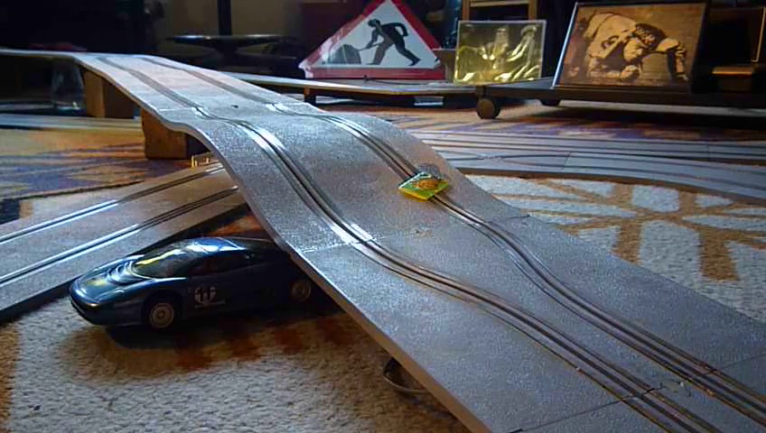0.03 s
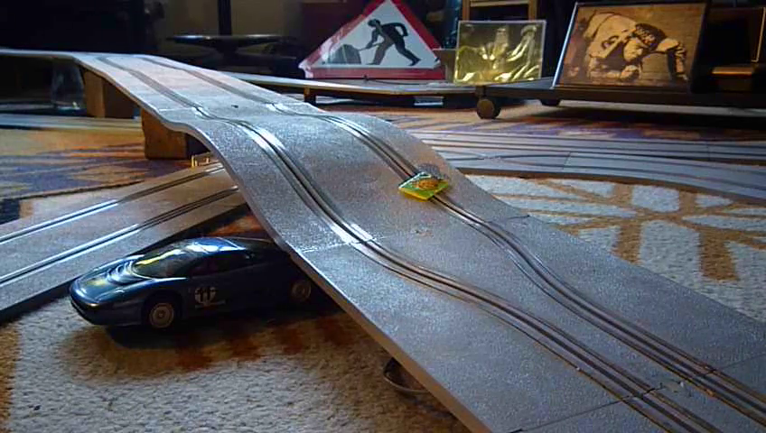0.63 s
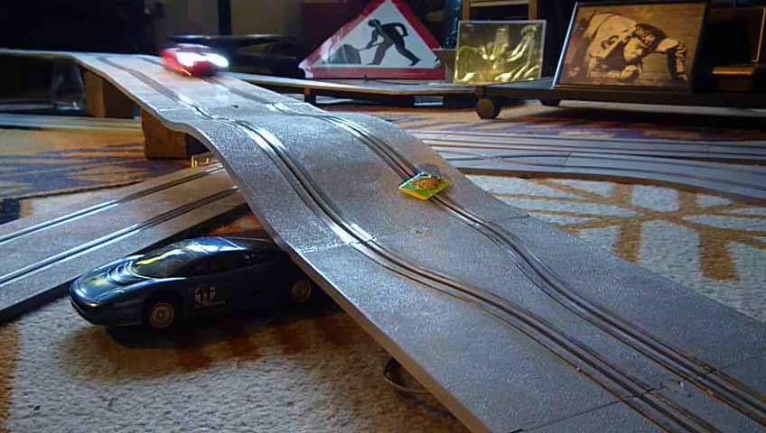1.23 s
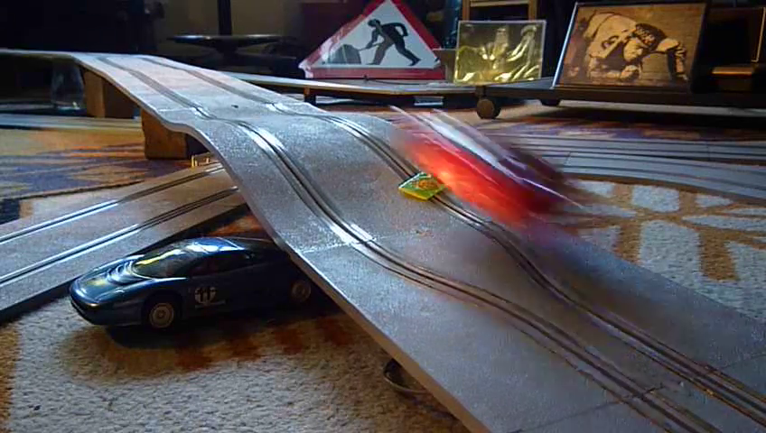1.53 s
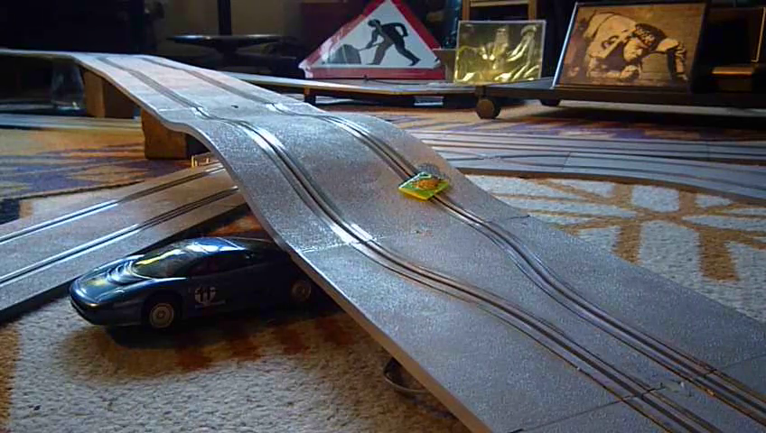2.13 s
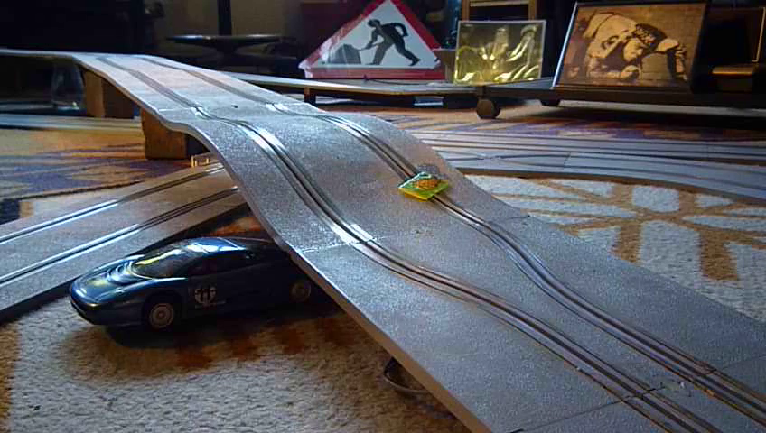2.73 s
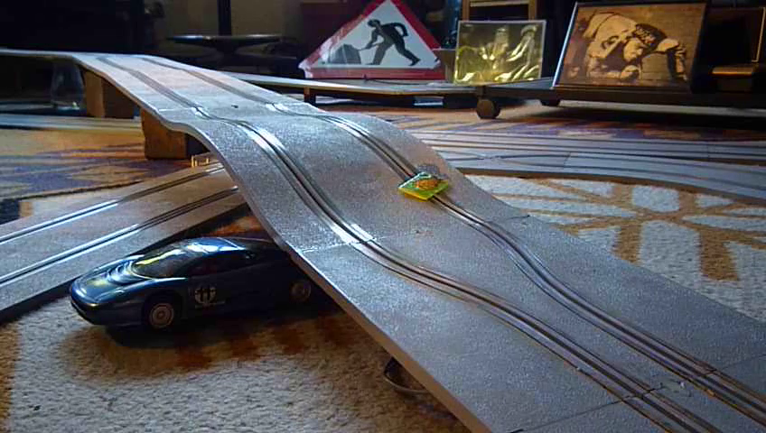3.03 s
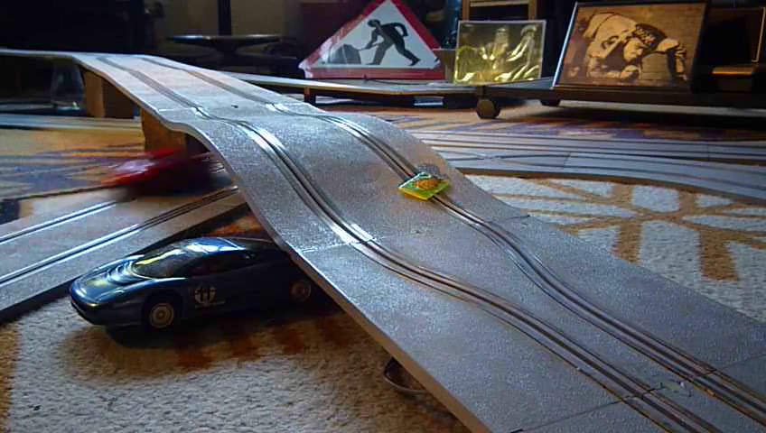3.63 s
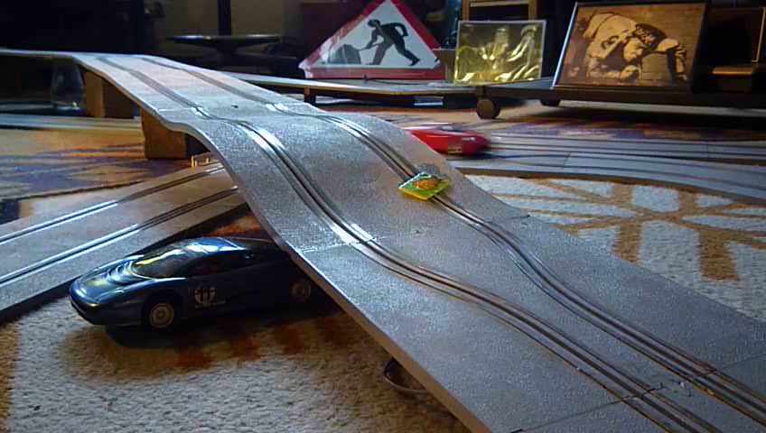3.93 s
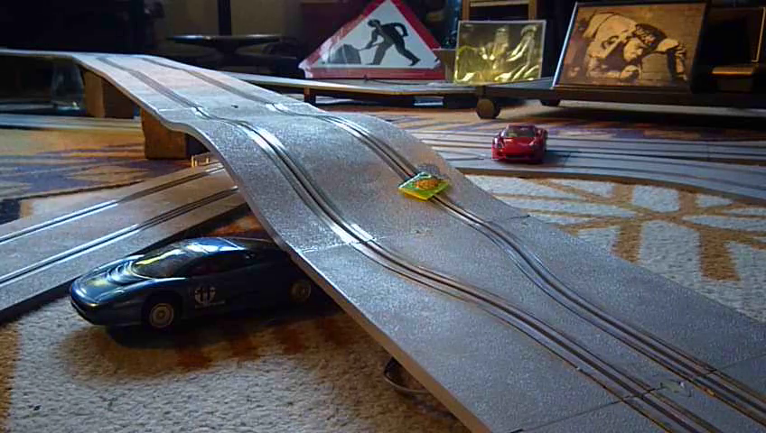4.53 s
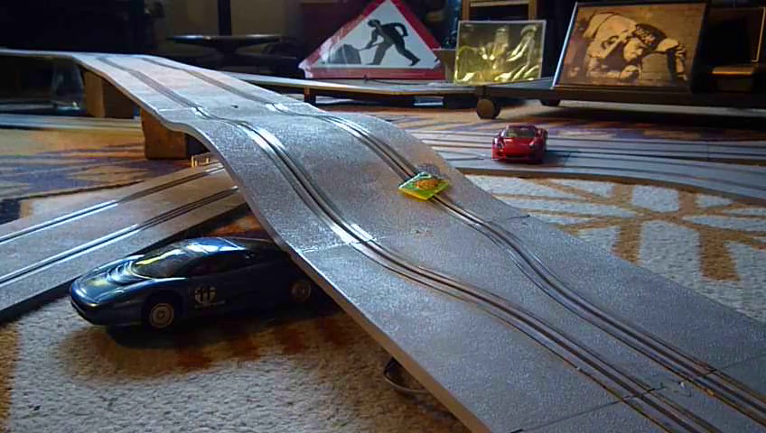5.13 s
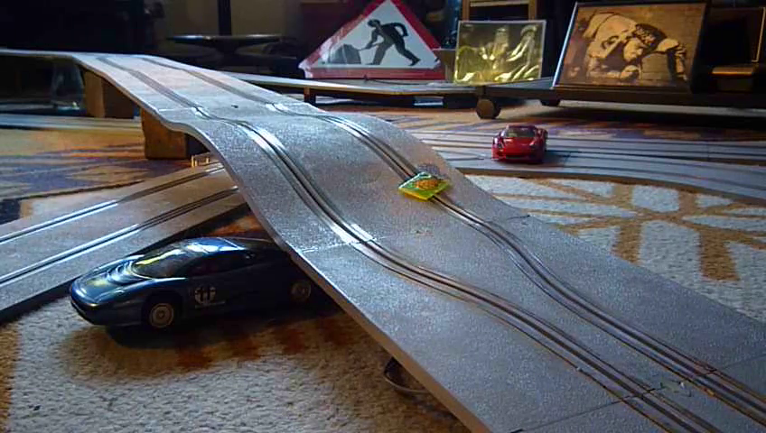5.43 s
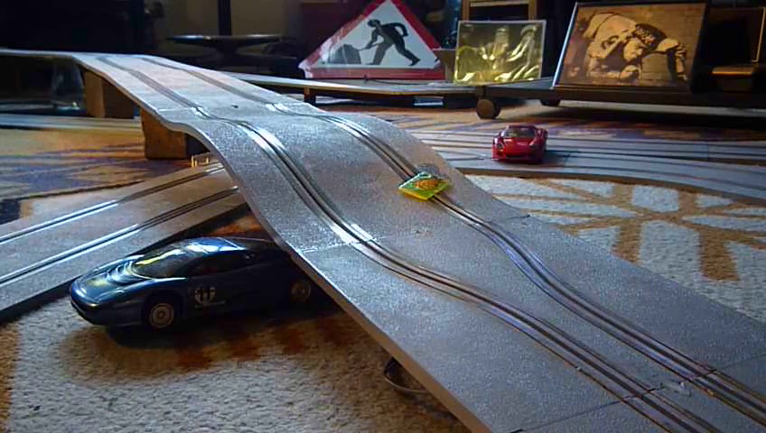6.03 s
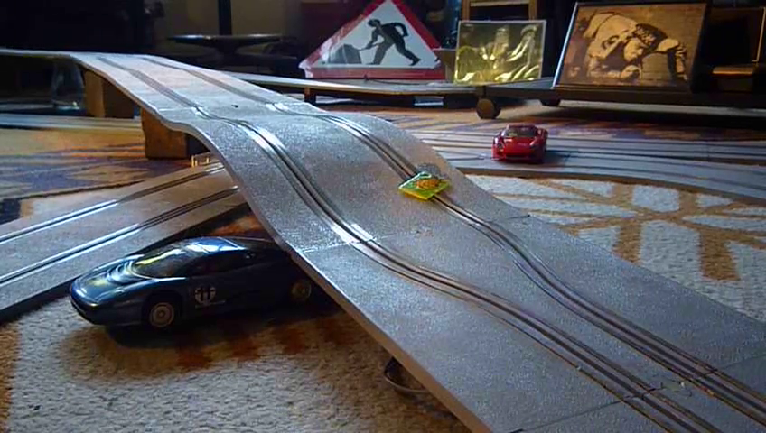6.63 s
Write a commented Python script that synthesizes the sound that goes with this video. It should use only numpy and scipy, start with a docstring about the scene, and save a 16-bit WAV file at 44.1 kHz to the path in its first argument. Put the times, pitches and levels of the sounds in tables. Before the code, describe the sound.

A toy slot car is already running on a plastic track in a furnished room, with a wavering motor whirr, rattling gears and a light tyre rumble. Its metal contacts squeak briefly at about 0.3 seconds and scrape around 1 second, as it speeds up over a hollow bridge and clicks across joints. From 1.5 to 1.8 seconds it hits a ramp close to the microphone, lands and bounces in a burst of sharp plastic clacks, the loudest moment. The motor drops in pitch and runs on, with a sharp click at 2.2 seconds and lighter ones until about 2.7. Around 4 seconds the car scrapes and skids with a few duller knocks, winding down to a stop by 4.3 seconds. A faint steady hiss with a thin whine, present throughout, remains to the end, broken by a light plastic tick at about 6.5 seconds.

```python
"""Slot car with a jump

A toy slot car laps a plastic track in a room: tyres rumble, gears whirr and the pickup braids
scrape the rails. It crosses a hollow bridge, jumps close to a small camera, lands, clicks over
joints, skids through a bend and stops. The camera adds hiss, a thin whine and faint crackle."""
import sys
import numpy as np
from scipy import signal
from scipy.fft import rfft, irfft, next_fast_len
from scipy.io import wavfile
from scipy.ndimage import map_coordinates

SR = 44100
rng = np.random.default_rng(int(sys.argv[2]) if len(sys.argv) > 2 else 0)


def master(y):
    """Save y as 16-bit WAV."""
    cut = np.clip(np.atleast_2d(y).T, -1, 1)
    pcm = np.round(cut * 32767)  # scale
    wavfile.write(sys.argv[1], SR, pcm.astype(np.int16))


N = 298998
CRUISE_TURNS_PER_S, STOP_S = 312, 4.3
BRIDGE_ON_S, BRIDGE_OFF_S = 0.62, 1.63


def amp(db):
    """Decibels to gain."""
    return 10 ** (np.asarray(db) / 20)


def unit_rms(x):
    """x scaled to rms 1."""
    return x / np.sqrt(np.mean(x ** 2) + 1e-20)


def at_hz(points, hz):
    """(Hz, value) points read on a log frequency axis."""
    freqs, values = np.transpose(points)
    return np.interp(np.log(hz + 1), np.log(freqs + 1), values)


def curve(points):
    """(seconds, value) points read at every sample."""
    return np.interp(np.arange(N) / SR, *np.transpose(points))


def wobble(knots_per_s):
    """A smooth random curve."""
    grid = np.arange(0, N * knots_per_s / SR + 1, 0.25)
    smooth = map_coordinates(rng.standard_normal(int(grid[-1]) + 4), [grid])
    return np.interp(np.arange(N) * knots_per_s / SR, grid, smooth)


def swells_db(rows):
    """A bell-shaped rise for each row."""
    t = np.arange(N) / SR
    return sum(db * np.exp(-((t - centre_s) / half_s) ** 2) for centre_s, half_s, db in rows)


def gate(start_s, end_s, fade_s):
    """1 from start to end, fading in and out inside that span."""
    t = np.arange(N) / SR
    return np.clip(np.minimum(t - start_s, end_s - t) / fade_s, 0, 1)


def through(x, response):
    """x played through an impulse response."""
    return signal.oaconvolve(x, response)[:len(x)]


def colour(spectrum, size=4096):
    """Minimum-phase impulse response of energy 1, shaped by (Hz, dB) points."""
    cepstrum = irfft(np.log(amp(at_hz(spectrum, np.fft.rfftfreq(size, 1 / SR)))))
    cepstrum[1:size // 2] *= 2
    cepstrum[size // 2 + 1:] = 0
    response = irfft(np.exp(rfft(cepstrum)))
    return response / np.linalg.norm(response)


def grains(per_s, spread_db):
    """Random tiny contacts of uneven size, rms 1."""
    present = rng.random(N) < per_s / SR
    signs = rng.choice([-1, 1], N)
    sizes = amp(spread_db * rng.standard_normal(N).clip(-2, 2))
    return unit_rms(present * signs * sizes)


def add(out, start_s, sound):
    """Mix a sound in at start_s."""
    part = out[round(start_s * SR):][:len(sound)]
    part += sound[:len(part)]


# The motor climbs on straights and sags in bends. Each row: time in seconds, turns per second.
MOTOR_TURNS_PER_S = [(0, 293), (.5, 262), (.68, 265), (.8, 340), (1.0, 365), (1.3, 430), (1.6, 440),
                     (1.9, 266), (2.05, 245), (2.2, 267), (2.5, 240), (2.85, 234), (3.35, 260), (3.6, 258),
                     (3.7, 300), (3.98, 330), (4.1, 180), (4.3, 64)]
# The car's path. Each row: time in seconds, distance from the microphone in metres.
DISTANCE_M = [(0, 2.1), (.55, 1.78), (.82, 1.58), (1.18, 1.44), (1.42, .74), (1.62, 0.65), (1.76, 0.76),
              (1.92, 1.02), (2.2, 0.66), (2.34, 2.27), (2.62, 1.03), (2.78, 1.41), (3.25, 0.86),
              (3.75, 1.2), (4.25, 1.36)]


def running_gain(speed_power, near_power):
    """Running noise grows with speed and nearness: 1 at cruise a metre away, 0 after the stop."""
    speed = curve(MOTOR_TURNS_PER_S) / CRUISE_TURNS_PER_S
    return speed ** speed_power / curve(DISTANCE_M) ** near_power * gate(-1, STOP_S, fade_s=0.05)


# Tyre rumble. Each row: frequency in Hz, relative level in dB.
TYRE_SPECTRUM = [(50, -30.5), (130, -12), (420, -13), (620, -3), (900, -2.5), (1250, -3), (2000, -10),
                 (3200, -11.5), (8000, -32)]
# Track resonances. Each row: frequency in Hz, bandwidth in Hz, relative level in dB.
TRACK_MODES = [(620, 30, -7.5), (730, 52, -10), (884, 79, -7), (954, 52, -0.5), (1060, 98, -4),
               (1206, 110, -3), (1500, 89, -5.5), (1927, 190, -7), (2480, 170, -3.5)]
# The tail slides; tyres and gears judder. Each row: centre and half length in seconds, rise in dB.
TAIL_SLIDES = [(.36, 0.05, 7), (1.1, .035, 4), (1.32, .045, 6), (1.607, 0.019, 8.5), (1.69, 0.035, 5.5),
               (4.045, 0.048, 8)]


def rolling(tyre_db=-55, ring_db=-66, lumpy_db=2.5, section_db=4):
    """Tyres and guide blade drum on the track, whose resonances vary from section to section."""
    gain = running_gain(speed_power=1, near_power=1) * amp(swells_db(TAIL_SLIDES) + lumpy_db * wobble(45))
    bumps = grains(per_s=2500, spread_db=4.5) * gain
    out = amp(tyre_db) * through(bumps, colour(TYRE_SPECTRUM))
    t = np.arange(SR // 8) / SR
    for hz, width_hz, db in TRACK_MODES:
        ring = np.exp(-np.pi * width_hz * t) * np.sin(2 * np.pi * hz * t)
        out += amp(ring_db + db + section_db * wobble(7)) * through(bumps, ring / np.linalg.norm(ring))
    return out


# Three-pole motor and pinion. Each row: multiple of the shaft speed, relative level in dB.
MOTOR_ORDERS = [(2, -0.5), (3, 5), (4, -7.5), (5, -5.5), (6, 2), (7, -3.5), (9, -2), (12, -10)]
# Chassis response to the drive. Each row: frequency in Hz, relative level in dB.
CHASSIS_SPECTRUM = [(300, -32.5), (900, -10.5), (1250, -7.5), (1450, -1), (1680, -.5), (1900, -12.5),
                    (2450, -8), (2900, -17.5), (3500, -10), (4500, -23)]


def gears(rattle_db=-54.5, tone_db=-62, waver=0.02527, depth=0.47, flutter_db=3):
    """Motor tones waver with load and loose teeth rattle once a turn, both through the chassis."""
    turns = np.cumsum(curve(MOTOR_TURNS_PER_S) * (1 + waver * wobble(70))) / SR
    chassis = colour(CHASSIS_SPECTRUM)
    teeth = (1 + depth * np.cos(2 * np.pi * turns)) * grains(per_s=3000, spread_db=1.5)
    rattle = unit_rms(through(teeth, chassis)) * amp(rattle_db + swells_db(TAIL_SLIDES))
    tones = sum(amp(db + flutter_db * wobble(40)) * np.sin(2 * np.pi * (order * turns + rng.random()))
                for order, db in MOTOR_ORDERS)
    whirr = amp(tone_db) * unit_rms(through(tones, chassis))
    return running_gain(speed_power=0.37, near_power=0.83) * (rattle + whirr)


# Contact with the rails. Each row: frequency in Hz, relative level in dB.
RAIL_SPECTRUM = [(500, -16.5), (1500, -2), (2400, 4.5), (3000, 1.5), (3600, 2.5), (4600, -4), (5400, -3),
                 (6500, -1.5), (8000, -5.5), (10000, -38.5)]
# The braids dig in. Each row: centre and half length in seconds, rise in dB.
BRAID_SCRAPES = [(.995, 0.046, 15.5), (1.38, .15, 2), (2.12, 0.046, 9), (2.39, .02, 9), (2.63, .08, 4),
                 (3.6, 0.1, 4), (3.895, 0.026, 10), (4.04, 0.072, 10)]
# Braid squeal. Each row: frequency in Hz, relative level in dB.
SQUEAL_SPECTRUM = [(350, -23), (470, 3), (620, -21), (880, -16), (1400, -33), (3800, -14), (4500, 2.5),
                   (5000, -8), (5600, -6), (6500, -15), (8500, -19.5)]


def braids(scrape_db=-60, squeal_db=-45, squeal_at_s=0.314, squeal_length_s=0.1, fade_db_per_s=106):
    """Copper braids catch and slip on the steel rails, and squeal once."""
    gain = running_gain(speed_power=0.74, near_power=0.55)
    gain *= amp(swells_db(BRAID_SCRAPES) + 2 * wobble(50))
    scrape = through(grains(per_s=1800, spread_db=4), colour(RAIL_SPECTRUM)) * gain
    age_s = np.maximum(np.arange(N) / SR - squeal_at_s, 0)
    burst = gate(squeal_at_s, squeal_at_s + squeal_length_s, fade_s=0.01) * amp(-fade_db_per_s * age_s)
    squeal = through(grains(per_s=3000, spread_db=7), colour(SQUEAL_SPECTRUM)) * burst
    return amp(scrape_db) * scrape + amp(squeal_db) * squeal


def guide_ticks(level_db=-63):
    """The guide blade ticks at random against small flaws in the slot."""
    ticks = through(grains(per_s=28, spread_db=3.5), colour(RAIL_SPECTRUM))
    return amp(level_db) * ticks * running_gain(speed_power=1.2, near_power=0.9)


# Camera hiss. Each row: frequency in Hz, relative level in dB.
HISS_SPECTRUM = [(25, -21), (55, -13.5), (90, -5), (150, -0.5), (260, -1), (450, -2.5), (800, -8),
                 (1400, -12.5), (2600, -17.5), (4500, -20.5), (8000, -22), (10000, -48)]


def camera_noise(hiss_db=-55.5, whine_db=-73, whine_hz=445, fall_db=0.9, crackle_db=-78):
    """The camera's steady hiss, thin electrical whine and sparse crackle."""
    hiss = amp(hiss_db) * unit_rms(through(rng.standard_normal(N), colour(HISS_SPECTRUM)))
    phase = 2 * np.pi * np.cumsum(whine_hz * (1 + 0.00305 * wobble(12))) / SR
    whine = sum(amp(whine_db - fall_db * k) * np.sin(k * phase + 2 * np.pi * rng.random())
                for k in range(2, 13))
    snap = colour([(1000, -14), (4000, -7.5), (8000, 0), (10000, -29)])
    crackle = amp(crackle_db) * through(grains(per_s=6, spread_db=0.5), snap)
    return hiss + whine + crackle


# Bridge body. Each row: frequency in Hz, relative level in dB.
BRIDGE_SPECTRUM = [(100, -17.5), (250, -20.5), (400, -9.5), (485, -1), (560, -5.5), (700, -25), (1500, -52)]


def bridge(level_db=-59):
    """The hollow, loosely propped span resonates under the wheels."""
    gain = running_gain(speed_power=0.4, near_power=0.36) * gate(BRIDGE_ON_S, BRIDGE_OFF_S, fade_s=0.08)
    return amp(level_db) * gain * through(grains(per_s=1600, spread_db=3), colour(BRIDGE_SPECTRUM))


# The guide blade hits track joints. Each row: start in seconds, level in dB.
JOINT_HITS = [(1.218, -33), (1.265, -29.5), (1.401, -22.5), (1.766, -19), (2.248, -19.5), (2.38, -37),
              (2.553, -34), (2.642, -36), (2.673, -35), (2.739, -36)]
# The car hits the ramp, lands, bounces and slews against the slot.
# Each row: start in seconds, level in dB, hardness 0-1, shell ring in dB, rattle time scale in seconds.
CAR_HITS = [(1.500, -14, 0.8, -2, 0.014), (1.504, -12.5, 0.78, 6.5, .012), (1.581, -13.5, .5, -10, 0.028),
            (1.599, -16.5, .42, -8, .03), (1.657, -19.5, 1, -7, .02), (1.673, -18, .48, -5.5, 0.019),
            (1.686, -20, 0.6, 1, 0.018), (1.717, -23, .6, -5, .012), (3.961, -23.5, 0.1, -9, 0.051),
            (4.024, -26.5, .05, -5, 0.049), (4.034, -22.5, 0.09, -5, 0.039), (4.159, -28, 0, -5, .028),
            (4.205, -33.5, .1, -3, 0.041)]
# Soft to hard contact. Each row: hardness 0-1, then strike, crack, track knock and rail click in dB.
HARDNESS_DB = [(0, -23, -7.5, -1, -21), (.5, -8, 0, -4, -11), (1, -2, -1, -14.5, -7.5)]
# Car shell and chassis. Each row: frequency in Hz, relative level in dB, T60 in seconds.
SHELL_MODES = [(860, -11, .04), (1110, -13, .05), (1450, -0.5, 0.061), (1813, -13.5, 0.064),
               (2216, -3.5, .035), (2490, -8.5, .03), (3110, -1.5, 0.034), (3150, 0, 0.02),
               (3300, 6.5, .024), (3380, -3, 0.011), (4500, -6, .012), (5945, -8.5, 0.01),
               (6320, -2.5, .012)]
# Low track knock, mid clack and high rail click. Each row: frequency in Hz, relative level in dB.
KNOCK_SPECTRUM = [(50, -27), (130, -13), (380, -18.5), (600, -9), (720, -1), (860, 3.5), (960, 1),
                  (1120, 1), (1350, -0.5), (2200, -12), (5000, -29)]
CLACK_SPECTRUM = [(400, -22.5), (1200, 0), (1700, 8.5), (2400, 2), (2800, -5), (3200, 0), (3800, -5),
                  (7000, -19.5)]
CLICK_SPECTRUM = [(1500, -18), (3200, -1.5), (4400, -7.5), (6100, -3.5), (7200, -8.5), (8500, -10),
                  (10000, -42.5)]


def impacts(knock_db=-6, clack_db=-15, click_db=-8, ring_db=-15.5, boom_db=-20,
            strike_db=12, rattle_db=-6, crack_t60_s=0.02, settle=3.8):
    """A strike, a crack and rattling loose parts ring track and shell, and the bridge when on it."""
    out, t = np.zeros(N), np.arange(SR // 6) / SR
    knock, clack, click = colour(KNOCK_SPECTRUM), colour(CLACK_SPECTRUM), colour(CLICK_SPECTRUM)
    boom = colour(BRIDGE_SPECTRUM)
    modes = np.array([amp(db - 60 * t / t60_s) * np.sin(2 * np.pi * hz * t)
                      for hz, db, t60_s in SHELL_MODES])
    joints = [(start_s, db, 0.82, -8, 0.014) for start_s, db in JOINT_HITS]  # columns as in CAR_HITS
    grades, *columns = np.transpose(HARDNESS_DB)
    for start_s, db, hardness, shell_db, rattle_s in list(CAR_HITS) + joints:
        hard_db, crack_db, low_db, high_db = (np.interp(hardness, grades, col) for col in columns)
        strike = amp(strike_db + hard_db) * (t == 0)
        crack = amp(crack_db - 60 * t / crack_t60_s) * rng.choice([-1, 1], len(t))
        chatter = unit_rms(rng.standard_normal(len(t)) * (rng.random(len(t)) < 3000 / SR))
        force = strike + crack + chatter * amp(rattle_db - 60 * t / (settle * rattle_s))
        track = amp(clack_db) * clack + amp(knock_db + low_db) * knock + amp(click_db + high_db) * click
        if BRIDGE_ON_S < start_s < BRIDGE_OFF_S:
            track += amp(boom_db) * boom
        # The point of contact decides how strongly each mode rings.
        weights = amp(rng.normal(0, 1.8, len(modes))) * rng.choice([-1, 1], len(modes))
        ring = weights @ modes
        shell = amp(ring_db + shell_db) * ring / np.linalg.norm(ring)
        add(out, start_s, amp(db) * (through(force, track) + through(force, shell)))
    return out


# Light ticks after the stop. Each row: start in seconds, level in dB.
LATE_TICKS = [(6.514, -33.5), (6.561, -44)]


def late_ticks(t60_s=0.016, attack_s=0.001):
    """Light ticks: a brief ring with a bright edge."""
    out, t = np.zeros(N), np.arange(SR // 20) / SR
    envelope = amp(-60 * t / t60_s) * (1 - np.exp(-t / attack_s))
    for start_s, db in LATE_TICKS:
        ring = sum(np.sin(2 * np.pi * (hz * t + rng.random())) for hz in (1350, 1620, 1930))
        add(out, start_s, amp(db) * envelope * ring / 2)
        add(out, start_s, amp(db) * colour(CLICK_SPECTRUM))
    return out


# Room decay. Each row: frequency in Hz, T60 in seconds.
ROOM_T60_S = [(150, 0.39), (1000, 0.32), (4000, 0.26), (8000, 0.43)]


def room(x, wet_db=-5):
    """A furnished room answers with a short diffuse tail, 4 ms late."""
    hz, t, noise = signal.stft(rng.standard_normal(SR // 3), SR, nperseg=256)
    decay = amp(-60 * t / at_hz(ROOM_T60_S, hz)[:, None])
    _, tail = signal.istft(noise * decay, SR, nperseg=256)
    tail = np.pad(tail / np.linalg.norm(tail), (SR // 250, 0))
    return (x + amp(wet_db) * through(x, tail)) / np.hypot(1, amp(wet_db))


def scene():
    """The car in its room, over the camera's noise; mono."""
    car = rolling() + bridge() + gears() + braids() + guide_ticks() + impacts() + late_ticks()
    return (room(car) + camera_noise())[None]


def record(dry):
    """The camera rolls off steeply towards its band limit; its converter sits a little below zero."""
    top_hz, dc_offset = 8850, -0.0489
    size = next_fast_len(N + SR // 2)
    hz = np.fft.rfftfreq(size, 1 / SR)
    rolloff = amp(at_hz([(7000, 0.5), (7800, -4.5), (8300, -7.5), (top_hz, -20)], hz)) * (hz < top_hz)
    return irfft(rfft(dry, size) * rolloff, size)[:, :N] + dc_offset


dry = scene()
out = record(dry)
master(out)
```